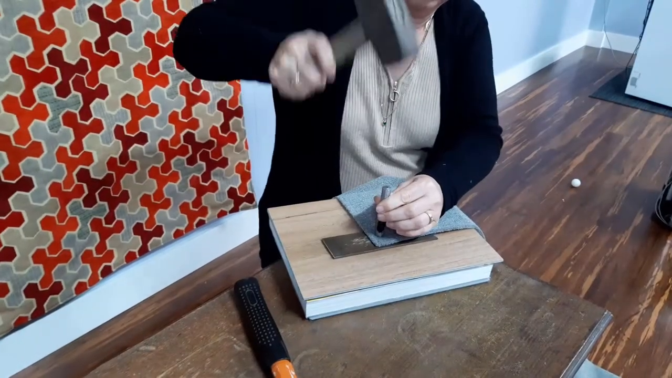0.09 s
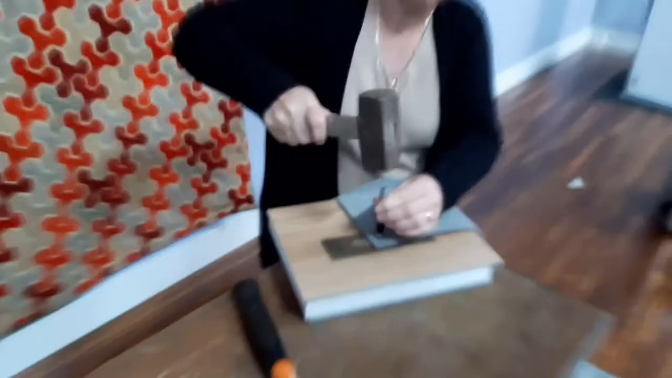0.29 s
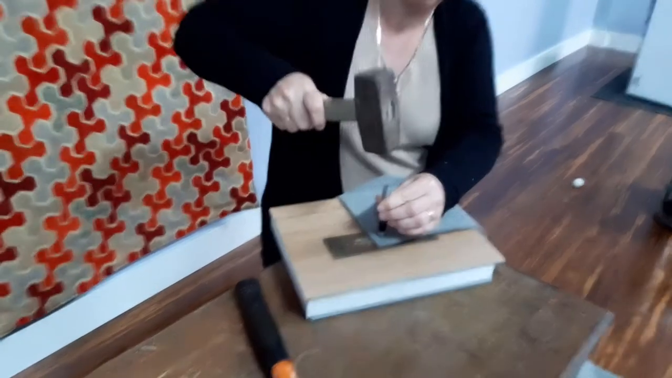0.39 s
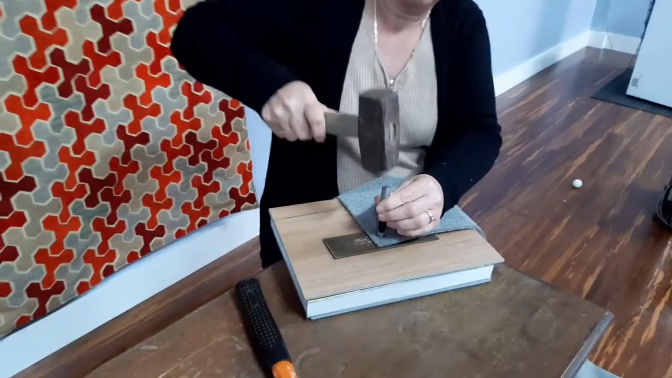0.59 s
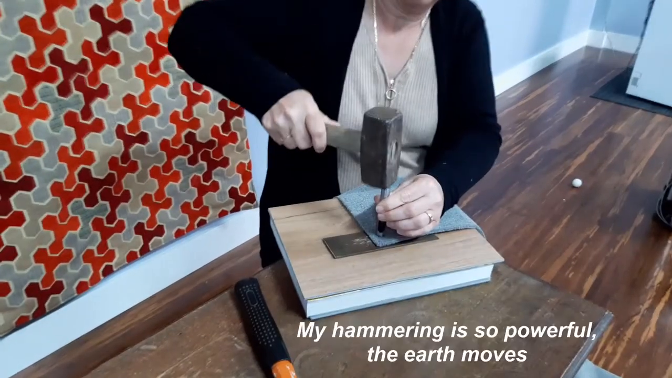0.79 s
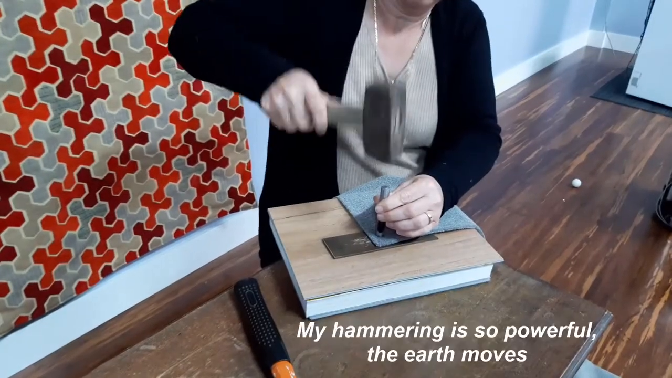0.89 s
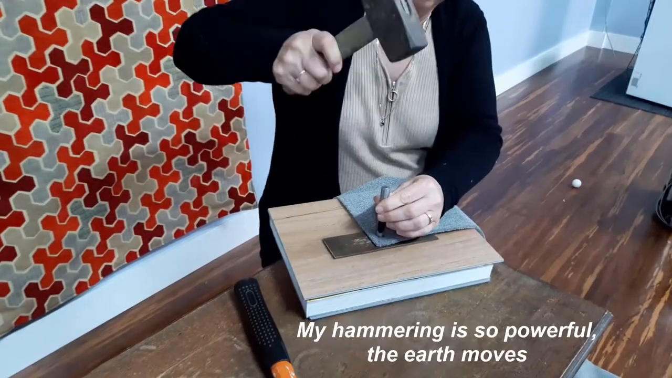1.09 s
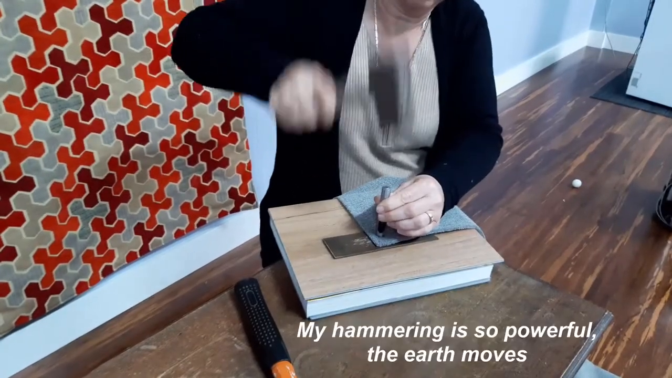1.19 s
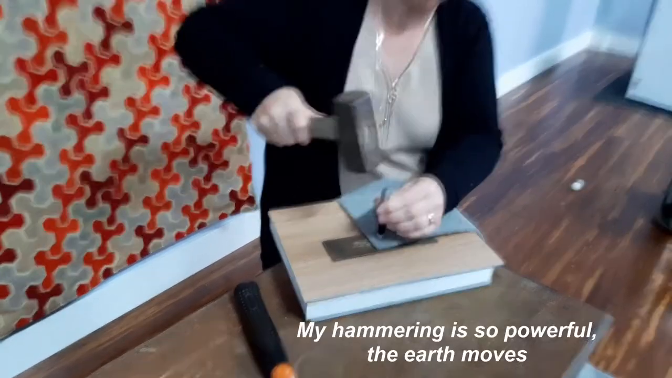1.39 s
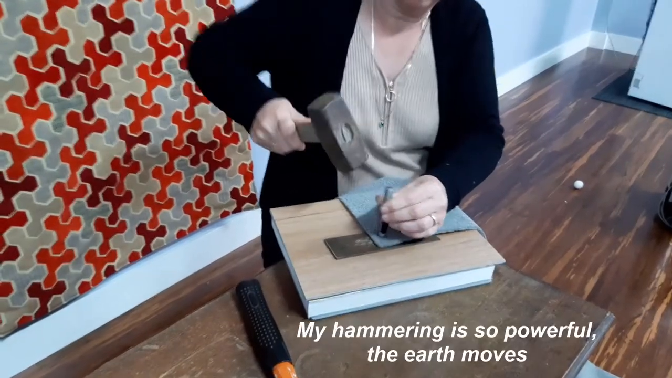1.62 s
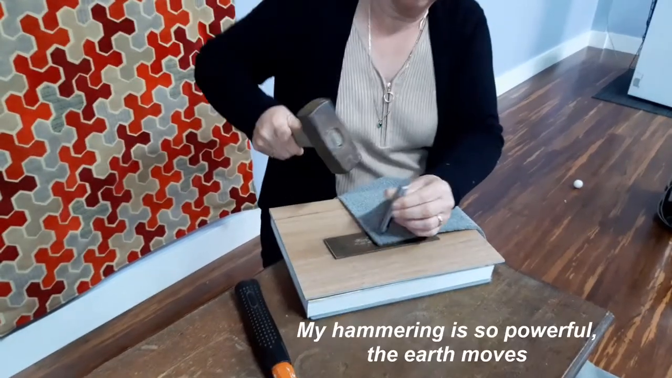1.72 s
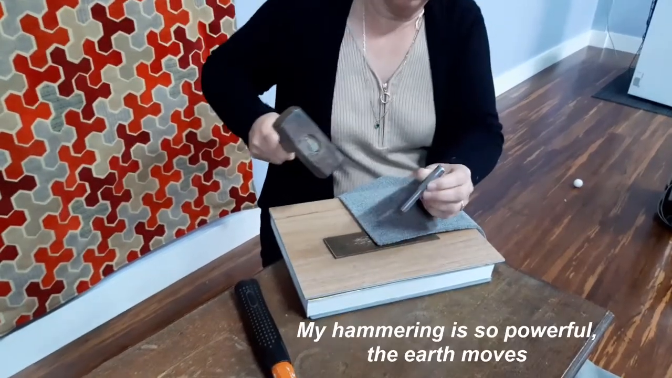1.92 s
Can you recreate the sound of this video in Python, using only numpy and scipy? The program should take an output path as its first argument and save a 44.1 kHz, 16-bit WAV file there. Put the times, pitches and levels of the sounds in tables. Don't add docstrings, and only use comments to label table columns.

```python
import sys
import numpy as np
from scipy import signal
from scipy.fft import rfft, irfft, next_fast_len
from scipy.io import wavfile
from scipy.ndimage import uniform_filter1d

SR = 44100
rng = np.random.default_rng(int(sys.argv[2]) if len(sys.argv) > 2 else 0)


def voltage_ratio(decibels):
    exponent = np.asarray(decibels, float) / 20
    return 10 ** exponent


def dump(signal):
    limited = np.clip(np.atleast_2d(signal).T, -1, 1)
    pcm = np.round(limited * 32767).astype(np.int16)
    wavfile.write(sys.argv[1], SR, pcm)


N = 88200


def unit(x):
    return x / np.sqrt(np.mean(x ** 2) + 1e-20)


def along(points, hz):
    freq_hz, value = np.transpose(points)
    return np.interp(np.log(hz + 1), np.log(freq_hz + 1), value)


def filtered(x, response):
    size = next_fast_len(x.shape[-1] + 4096)
    spectrum = rfft(x, size) * response(np.fft.rfftfreq(size, 1 / SR))
    return irfft(spectrum, size)[..., :x.shape[-1]]


# freq_hz, correlation
LIKENESS = [(60, 0.78), (180, 1), (550, 0.66), (1650, -0.3), (4970, -0.02), (15000, 0.12)]


def diffuse_noise(n, colour):
    def mid_side(hz):
        turn = np.arccos(np.clip(along(LIKENESS, hz), -1, 1)) / 2
        return colour(hz) * [np.cos(turn), np.sin(turn)]

    mid, side = filtered(rng.standard_normal((2, n)), mid_side)
    return unit(np.array([mid + side, mid - side]))


# freq_hz, level_db_per_hz
HUM_SPECTRUM = [(24, -54), (40, 13), (294, -39), (796, -17), (1540, -60), (2470, -11), (9000, -42),
                (11700, -85), (19800, -120)]


def room_hum():
    level_db = -77
    return voltage_ratio(level_db) * diffuse_noise(N, lambda hz: voltage_ratio(along(HUM_SPECTRUM, hz)))


# freq_hz, t60_s
ROOM_T60 = [(50, 2.3), (200, 1.368), (700, 1.677), (2000, 1.252), (5000, 1.015), (8000, 0.81),
            (12000, 0.68), (16000, 0.36)]
# freq_hz, level_db
ROOM_EARLY = [(250, -5), (1000, -16), (5000, -20), (12000, -10)]


def room_answer(spectrum, peaks, bright_db, t):
    swell_s, onset_s = 0.056, 0.0014

    def colour(hz):
        lift_db = bright_db * np.log2(1 + hz / 1000)
        for centre_hz, width_hz, peak_db in peaks:
            lift_db = lift_db + peak_db / (1 + (2 * (hz - centre_hz) / width_hz) ** 2)
        return voltage_ratio(along(spectrum, hz) + lift_db)

    hz, time_s, bins = signal.stft(diffuse_noise(len(t), colour), SR, nperseg=512)
    decay_db = -60 * time_s / along(ROOM_T60, hz)[:, None]
    swell_db = along(ROOM_EARLY, hz)[:, None] * np.clip(1 - time_s / swell_s, 0, 1)
    tail = signal.istft(bins * voltage_ratio(decay_db + swell_db), SR, nperseg=512)[1][:, :len(t)]
    return tail * (1 - np.exp(-t / onset_s))


# delay_s, level_db
WALLS = [(.0112, -8), (.0142, -16), (.021, -25), (.029, -25)]


def wall_echoes(near):
    top_hz = 8000
    dull = filtered(near, lambda hz: 1 / (1 + 1j * hz / top_hz))
    return sum(voltage_ratio(level_db) * np.roll(dull, round(delay_s * SR), axis=1) for delay_s, level_db in WALLS)


def camera_jolt(level_db, t):
    centre_hz, t60_s, rise_s = 70, 0.41, 0.0055

    def band(hz):
        return 1 / (1 + (2.0 * np.log(hz / centre_hz + 1e-9)) ** 4)

    shake = unit(filtered(rng.standard_normal((2, len(t))), band))
    return shake * voltage_ratio(level_db - 60 * t / t60_s) * (1 - np.exp(-t / rise_s))


def ring(modes, t, rise_s, scatter_db):
    total = 0
    for freq_hz, level_db, t60_s in modes:
        start_db = level_db + scatter_db * rng.standard_normal()
        total = total + voltage_ratio(start_db - 60 * t / t60_s) * np.sin(2 * np.pi * freq_hz * t)
    return (1 - np.exp(-t / rise_s)) * total


def desk_knock(modes, t):
    lag_s = 0.0015
    return ring(modes, np.clip(t - lag_s, 0, None), rise_s=0.0014, scatter_db=2)


def desk_flick(t):
    freq_hz, level_db = 600, 1
    return -voltage_ratio(level_db) * np.sin(2 * np.pi * freq_hz * t) * (t < 1 / freq_hz / 2)


def punch_clank(modes, t):
    left = ring(modes, t, rise_s=0.000195, scatter_db=3)
    right = ring(modes, t, rise_s=0.00014, scatter_db=3)
    return np.array([left, right])


def contact_crack(spectrum, t):
    contact_s, release_s, sag_db, side_gain = 0.0041, 0.006, 4.5, 1
    n = SR // 10
    mid, side = unit(filtered(rng.standard_normal((2, n)), lambda hz: voltage_ratio(along(spectrum, hz))))
    grit = np.pad(mid + side_gain * side * [[1], [-1]], ((0, 0), (0, len(t) - n)))
    release_db = -60 * np.clip(t - contact_s, 0, 1) / release_s
    return grit * voltage_ratio(release_db - sag_db * t / contact_s - 3)


def hits(events, crack_spectrum, punch, room_spectrum, room_peaks, desk, desk_db, jolt_db):
    lead_s, span_s = 1, 2
    out = np.zeros((2, N + (lead_s + span_s) * SR))
    t = np.arange(span_s * SR) / SR
    for start_s, crack_db, room_db, pan_db, *bright_db in events:
        near = contact_crack(crack_spectrum, t) + punch_clank(punch, t) + desk_flick(t)
        near = near + voltage_ratio(desk_db) * desk_knock(desk, t)
        near = near + wall_echoes(near)
        near = near + camera_jolt(jolt_db, t)
        far = room_answer(room_spectrum, room_peaks, sum(bright_db), t)
        sound = voltage_ratio(crack_db) * near + voltage_ratio(room_db) * far
        start = round((start_s + lead_s) * SR)
        out[:, start:][:, :len(t)] += sound * voltage_ratio([[pan_db / 2], [-pan_db / 2]])
    return out[:, lead_s * SR:][:, :N]


# time_s, level_db
HEAD_TURN = [(0, -83), (.07, -78.5), (.17, -99), (.25, -53.5), (.45, -63), (.6, -77), (.73, -82),
             (.82, -86), (.9, -69), (.97, -89), (1.09, -81.5), (1.22, -92), (1.4, -72), (1.58, -66),
             (1.7, -73.5), (1.83, -80.5), (2, -86)]


def hammer_head_ring():
    freq_hz, pan_db, gain_db = 10655, 13.5, 7.5
    t = np.arange(N) / SR
    level_db = uniform_filter1d(np.interp(t, *np.transpose(HEAD_TURN)), size=SR // 40)
    tone = voltage_ratio(level_db + gain_db) * np.sin(2 * np.pi * freq_hz * t)
    return tone * voltage_ratio([[pan_db / 2], [-pan_db / 2]])


# start_s, crack_db, room_db, left_over_right_db
TAP = [
    (.7500, -23.5, -39.5, -6.5),
]
# freq_hz, level_db_per_hz
TAP_CRACK = [(500, 1), (1300, -15), (2200, -25), (3700, -2), (6000, -20), (8400, -17.5), (10000, -24.5),
             (16000, -40)]
TAP_ROOM = [(250, -2), (1000, -8.5), (1900, -24.5), (2700, -9.5), (4300, -11), (6300, -28.5),
            (10000, -34.5), (15500, -38)]
# freq_hz, width_hz, lift_db
TAP_PEAKS = [(288, 60, 3), (3500, 900, 1.5), (8500, 1000, 12)]
# freq_hz, level_db, t60_s
TAP_PUNCH = [(2800, -10, 0.027), (3424, -6, .025), (3750, -9, 0.023), (4460, -19, 0.028),
             (8590, -11, 0.012)]
TAP_DESK = [(301, 0.5, 0.073), (408, -2, 0.049), (480, -3, 0.043), (750, -8, 0.028)]


def light_tap():
    return hits(TAP, TAP_CRACK, TAP_PUNCH, TAP_ROOM, TAP_PEAKS, TAP_DESK, desk_db=7.5, jolt_db=-31)


# start_s, crack_db, room_db, left_over_right_db, room_brightness_db_per_octave
BLOWS = [
    (-0.78, -5, -15, 1, 1.5),
    (.2006, -7.5, -11, 1, -0.37),
    (1.2402, -8, -11.5, 0.5, 0),
]
# freq_hz, level_db_per_hz
BLOW_CRACK = [(240, 18), (400, -6), (1780, -3.5), (2930, -10), (8320, -9), (12100, -13), (13700, -10),
              (16500, -14)]
BLOW_ROOM = [(24, -72), (40, -52), (148, -14), (211, -6.5), (536, -8), (1260, -12.5), (11900, -34),
             (15300, -32), (16500, -78)]
# freq_hz, width_hz, lift_db
BLOW_PEAKS = [(95, 13, 9), (215.6, 49, 9), (284.5, 46, 8), (558, 37, 4.5), (1654, 510, -3.5),
              (2030, 250, 3.5), (5660, 746, 6), (6950, 1290, 7)]
# freq_hz, level_db, t60_s
BLOW_PUNCH = [(1050, -6, 0.01), (1470, -4.5, 0.015), (1977, -6, 0.015), (3055, -12, 0.012),
              (3830, -12, 0.015), (4520, -14, 0.015), (6960, -14, .012), (8220, -9.5, 0.0073)]
BLOW_DESK = [(101, -16, .12), (215, -8, 0.12), (305.6, -0.5, 0.12), (645, -8.5, 0.059), (780, -14, .03)]


def hammer_blows():
    return hits(BLOWS, BLOW_CRACK, BLOW_PUNCH, BLOW_ROOM, BLOW_PEAKS, BLOW_DESK, desk_db=1.5, jolt_db=-19)


def scene():
    return room_hum() + hammer_head_ring() + light_tap() + hammer_blows()


def treble_masked(x):
    low_hz, threshold_db, drop_db = 9200, -60.5, -15
    hz, _, bins = signal.stft(x, SR, nperseg=1024)
    power = uniform_filter1d(np.mean(np.abs(bins) ** 2, axis=0), size=3, axis=1)
    share = uniform_filter1d(power, size=15, axis=0) / (power.sum(axis=0) + 1e-20)
    share_db = 10 * np.log10(np.abs(share) + 1e-20)
    drop = np.clip((threshold_db - share_db) / 2 + 0.5, 0, 1) * (hz > low_hz)[:, None]
    return signal.istft(bins * voltage_ratio(drop_db * drop), SR, nperseg=1024)[1][:, :N]


def band_limit(x):
    return signal.sosfilt(signal.butter(12, 16980, fs=SR, output="sos"), x)


def record(dry):
    low_hz, top_hz, hiss_db = 43.4, 16000, -92

    def mic(hz):
        return (1j * hz / (low_hz + 1j * hz)) ** 2 / (1 + (hz / top_hz) ** 40)

    limited = dry / (1 + np.abs(dry) ** 6) ** (1 / 6)
    heard = treble_masked(filtered(limited, mic))
    mix = heard + voltage_ratio(hiss_db) * rng.standard_normal((2, N))
    return band_limit(mix)


dry = scene()
out = record(dry)
dump(out)
```